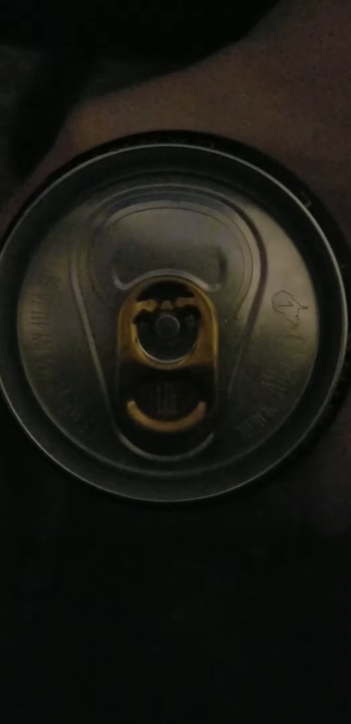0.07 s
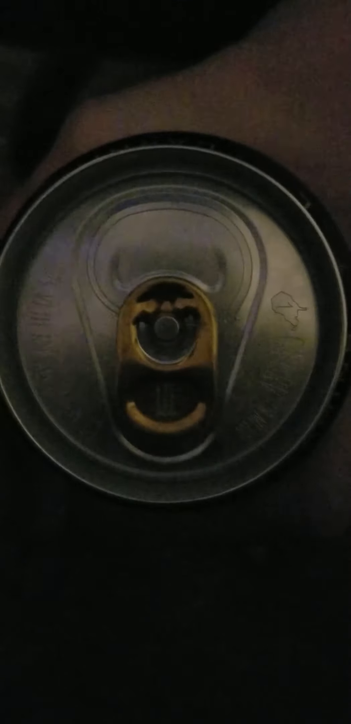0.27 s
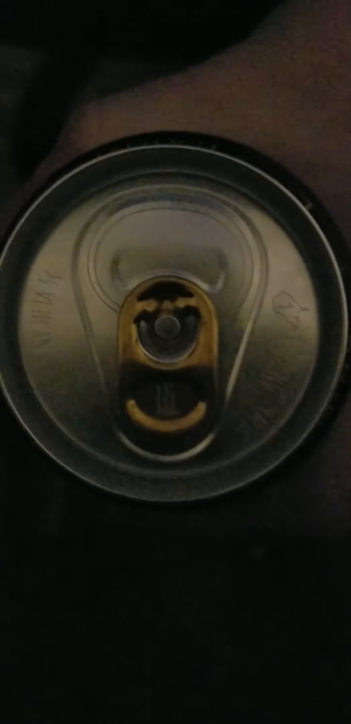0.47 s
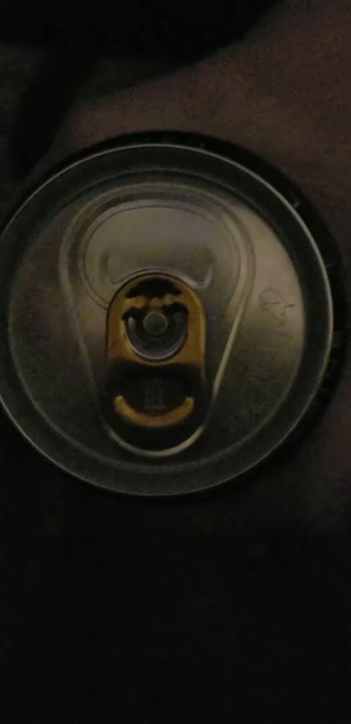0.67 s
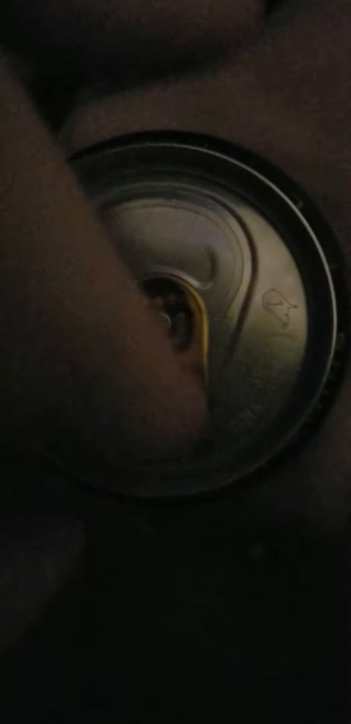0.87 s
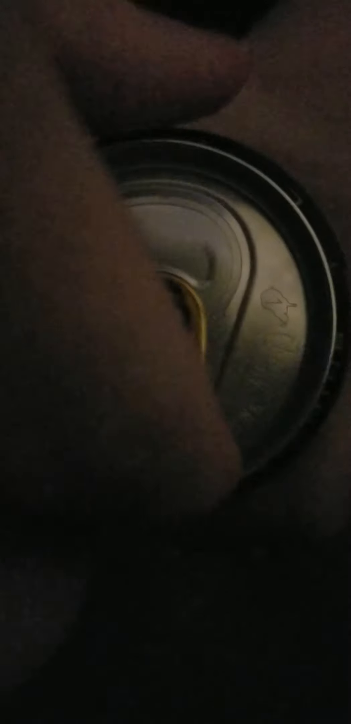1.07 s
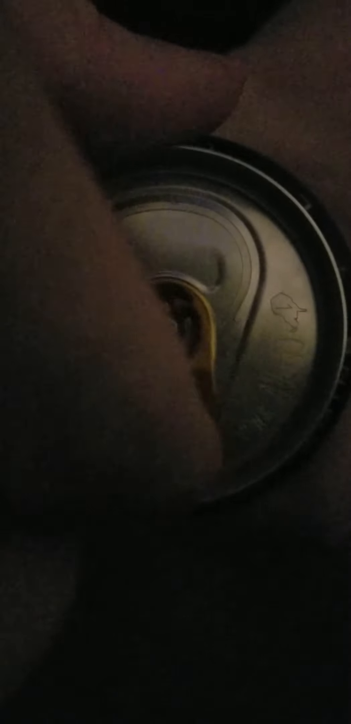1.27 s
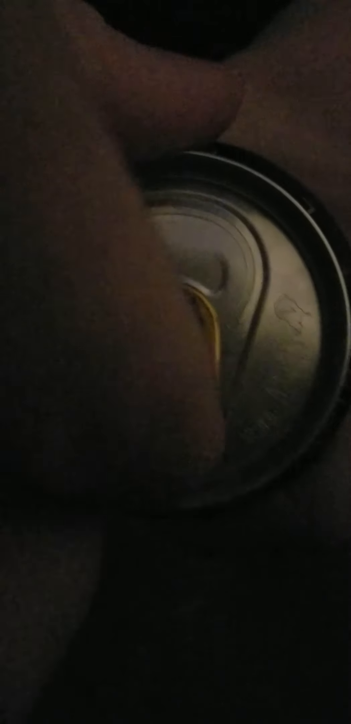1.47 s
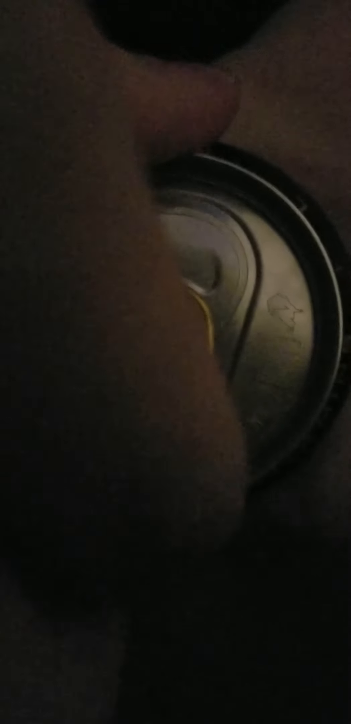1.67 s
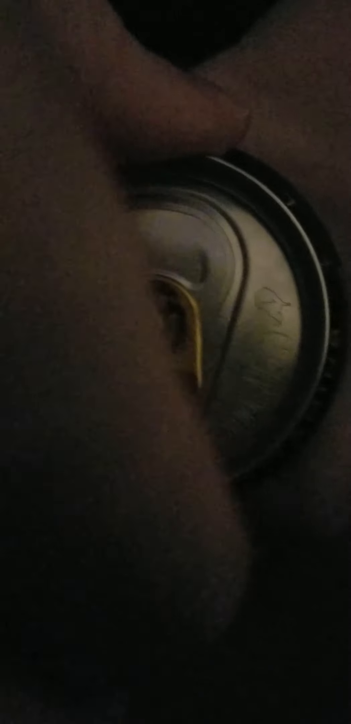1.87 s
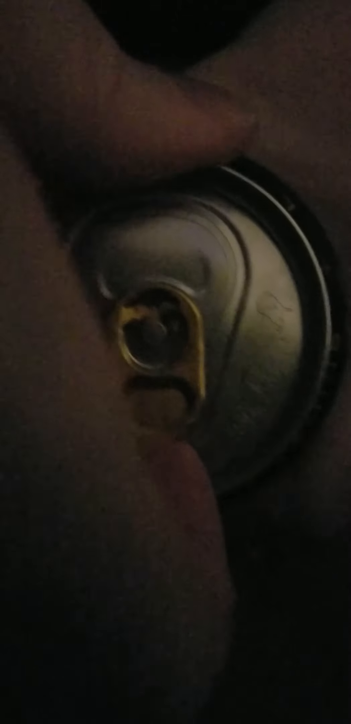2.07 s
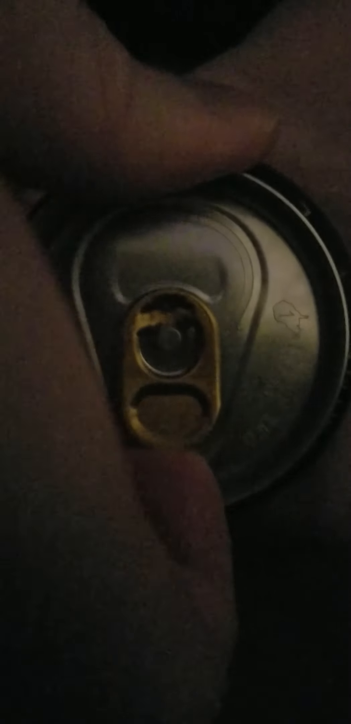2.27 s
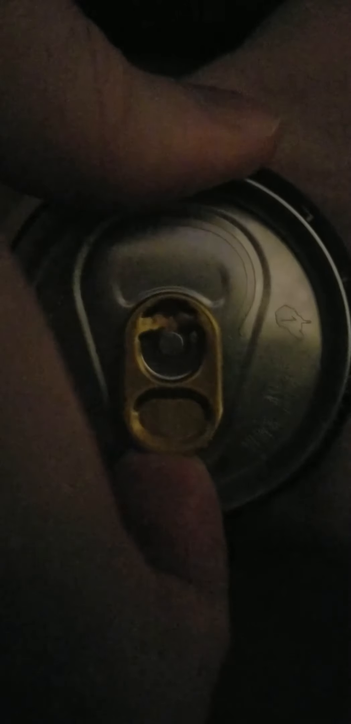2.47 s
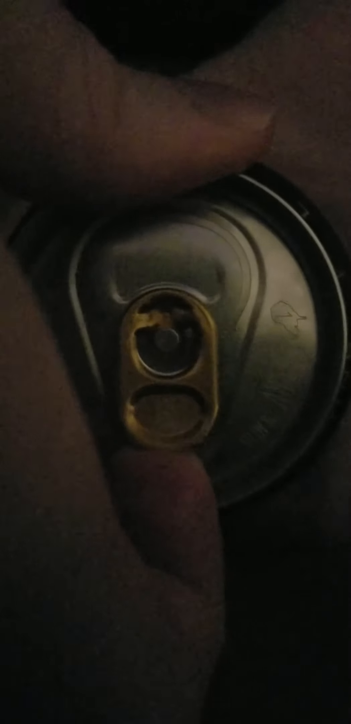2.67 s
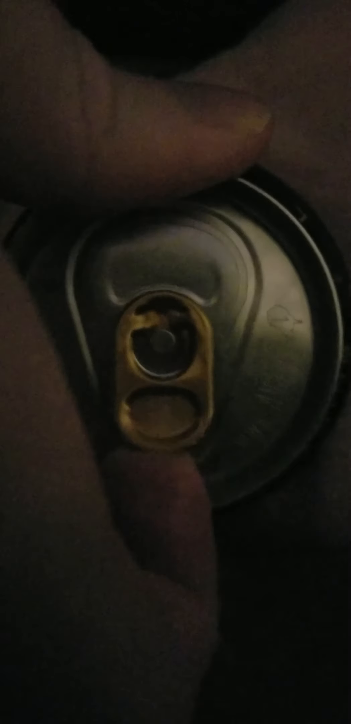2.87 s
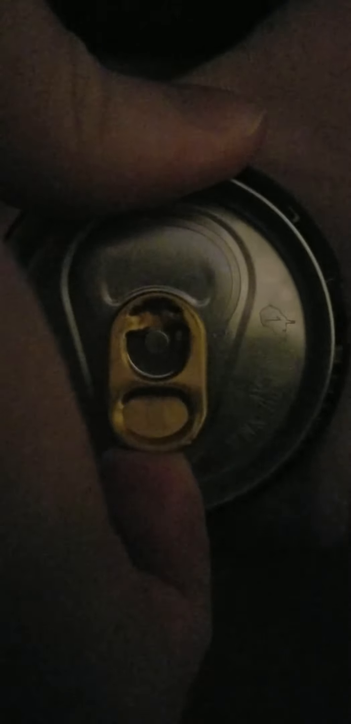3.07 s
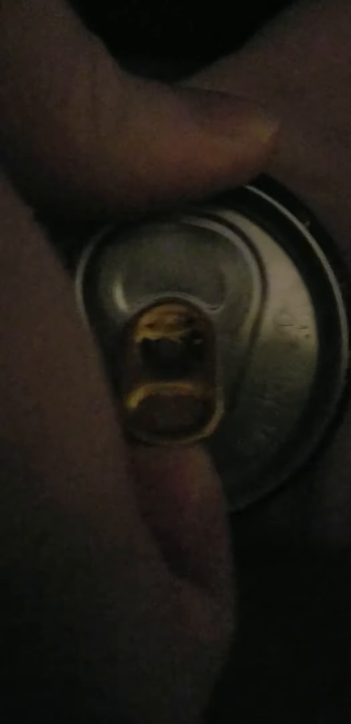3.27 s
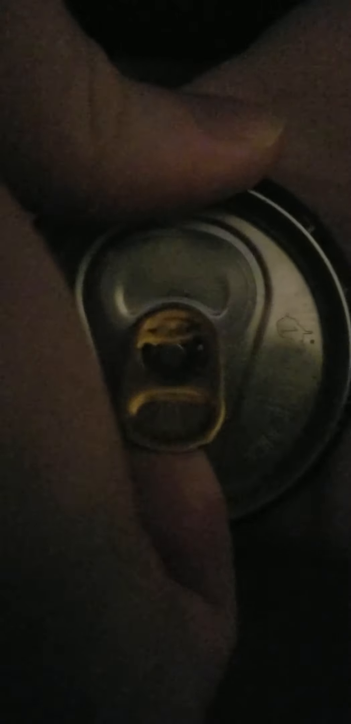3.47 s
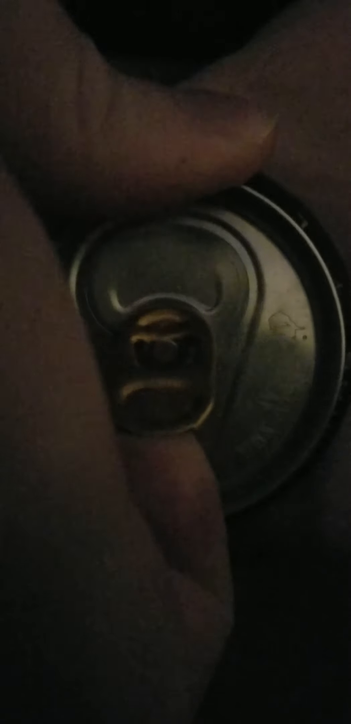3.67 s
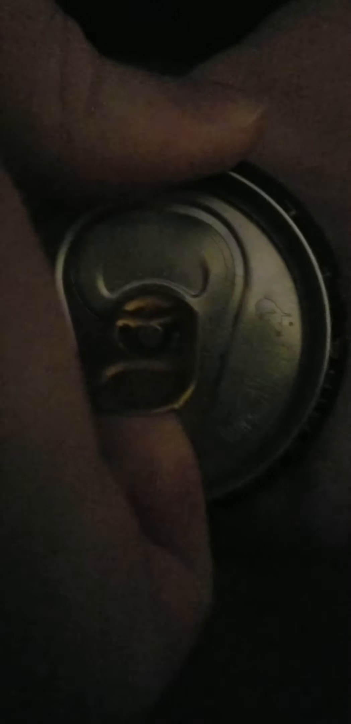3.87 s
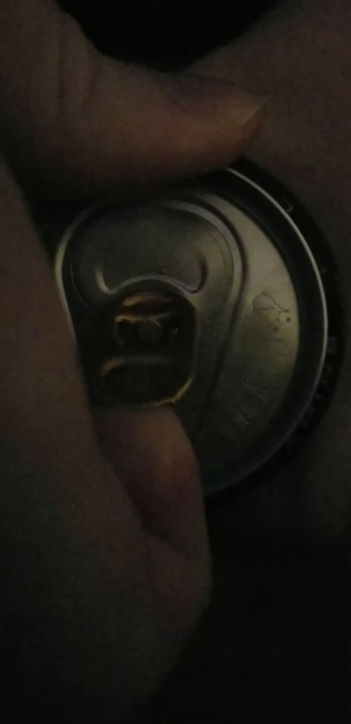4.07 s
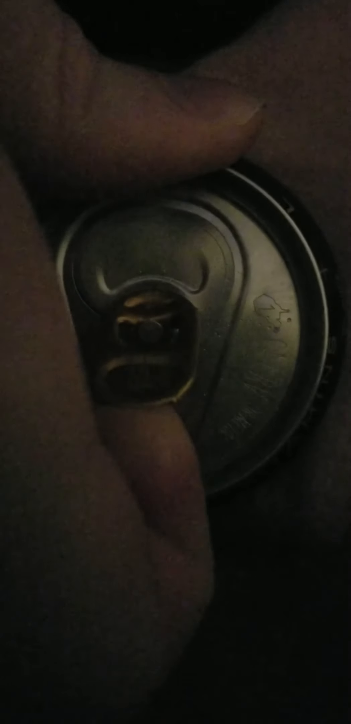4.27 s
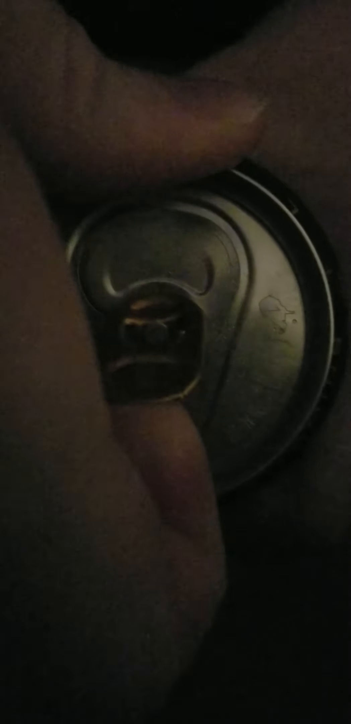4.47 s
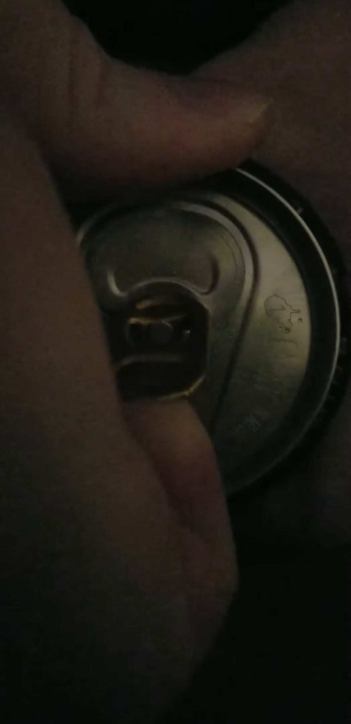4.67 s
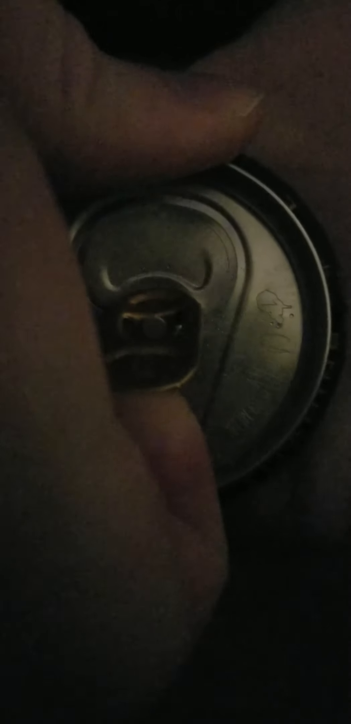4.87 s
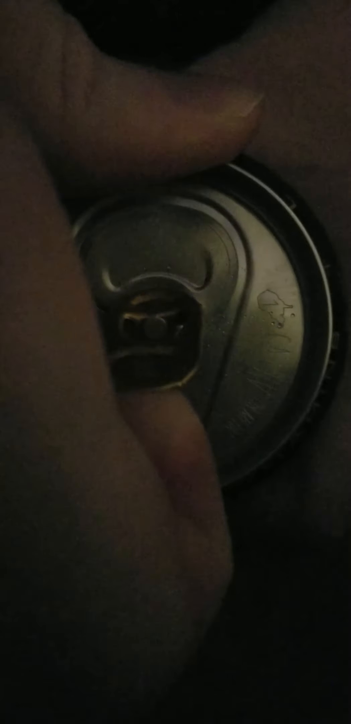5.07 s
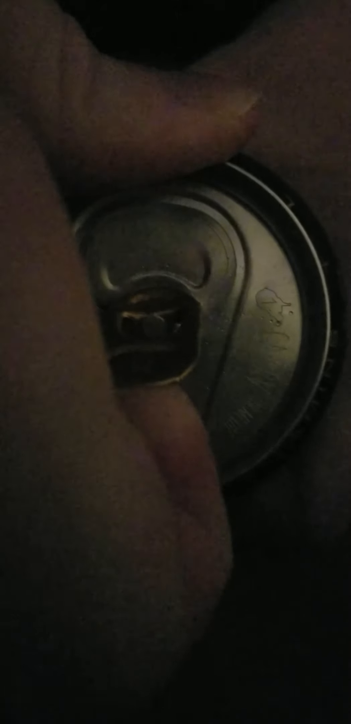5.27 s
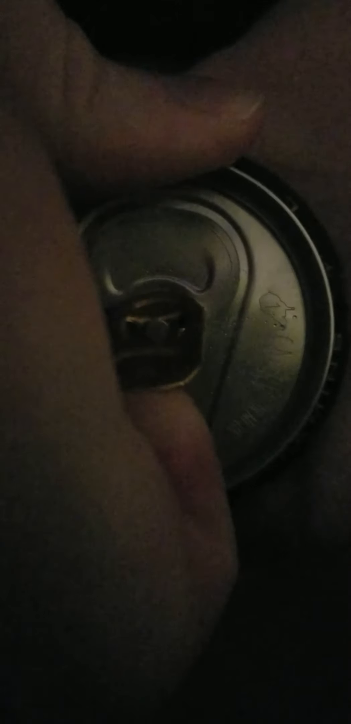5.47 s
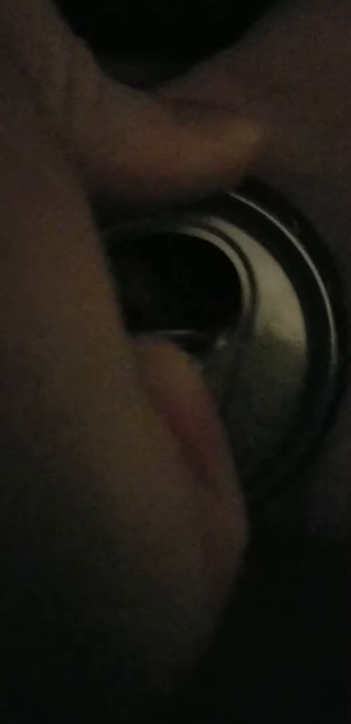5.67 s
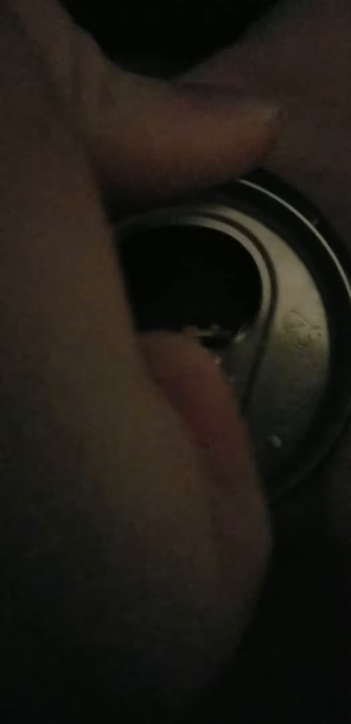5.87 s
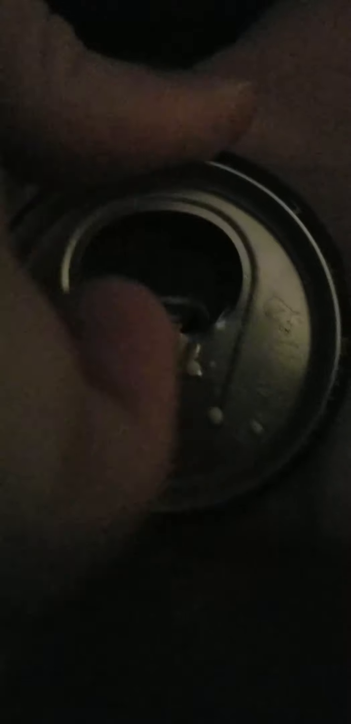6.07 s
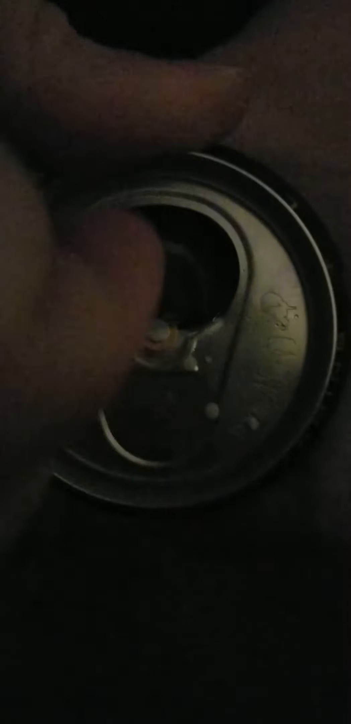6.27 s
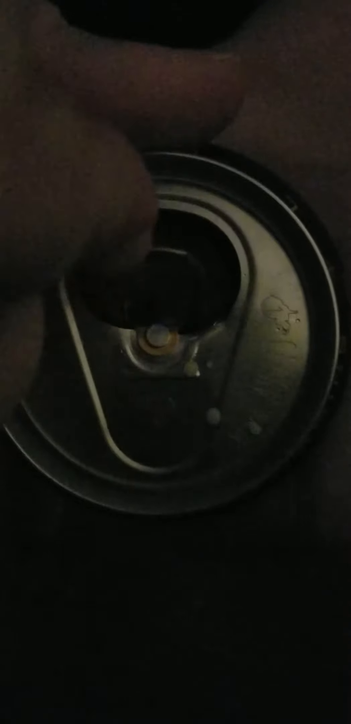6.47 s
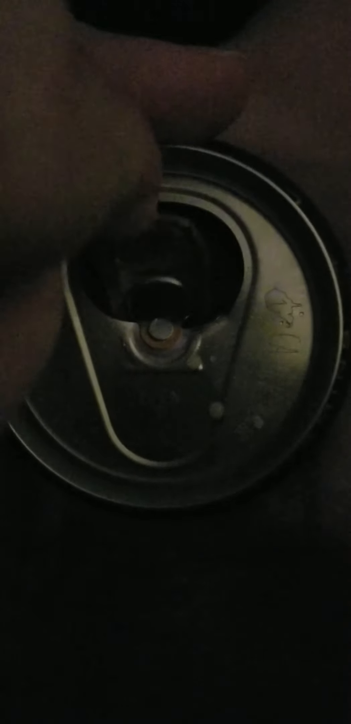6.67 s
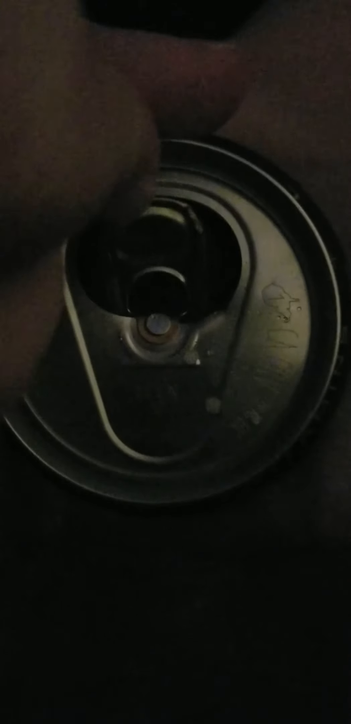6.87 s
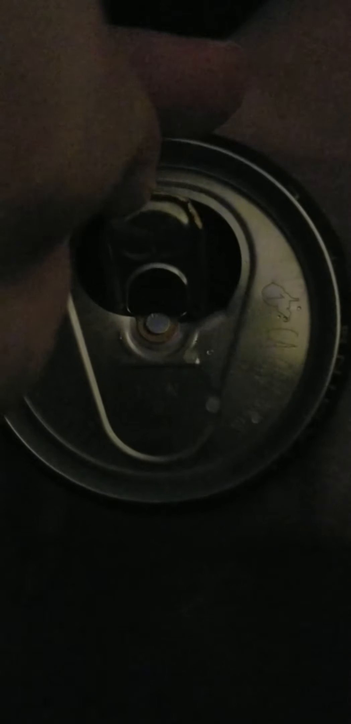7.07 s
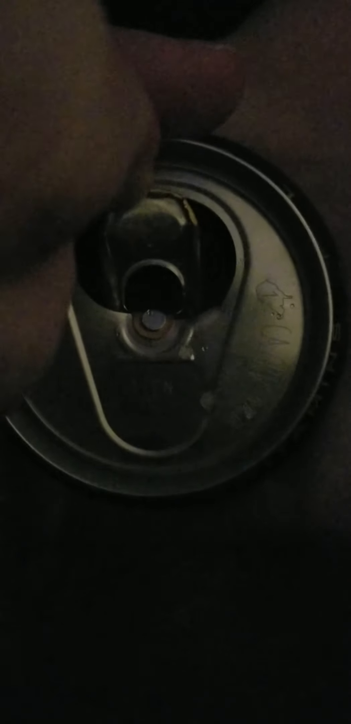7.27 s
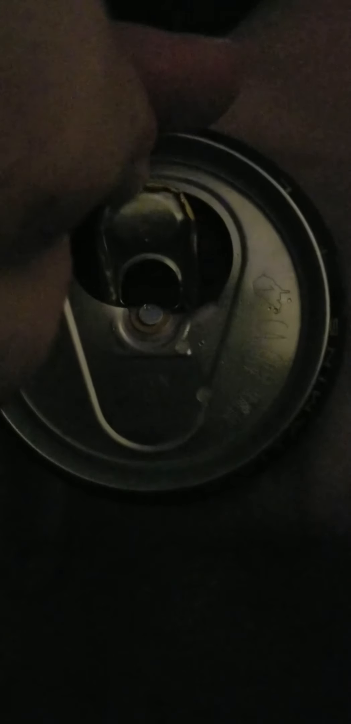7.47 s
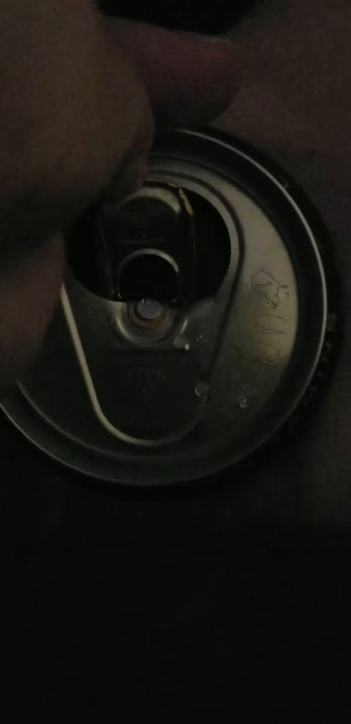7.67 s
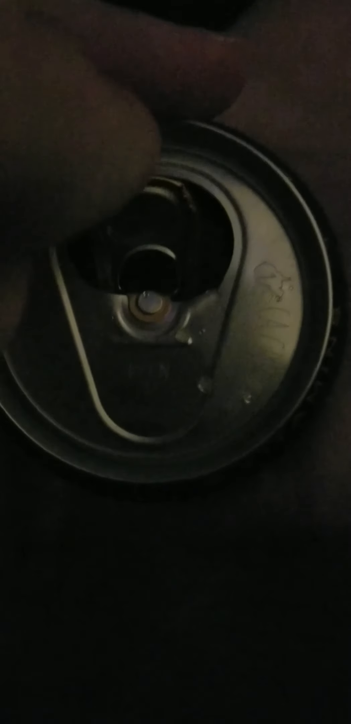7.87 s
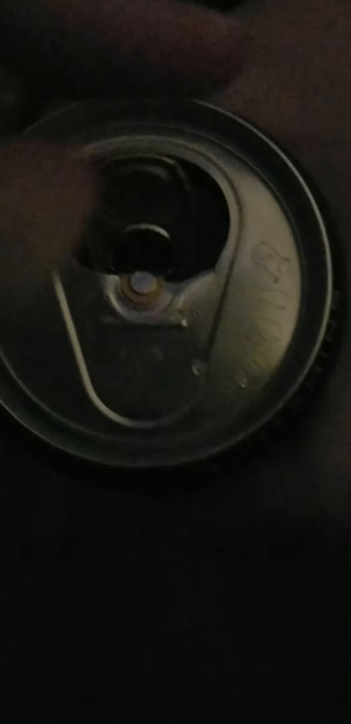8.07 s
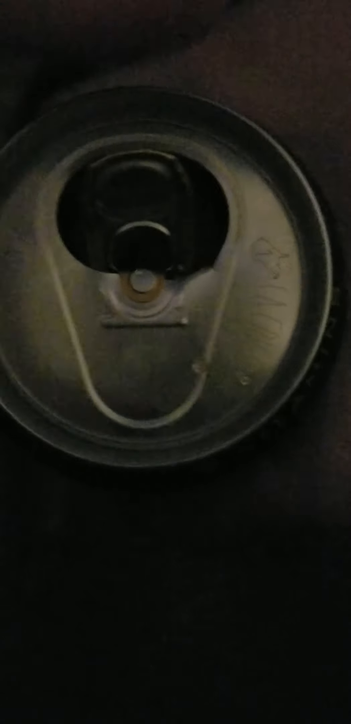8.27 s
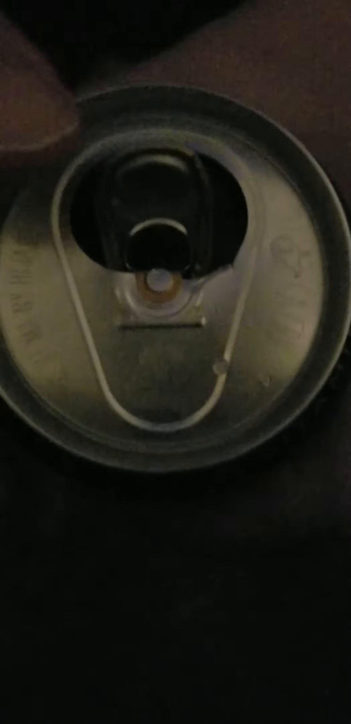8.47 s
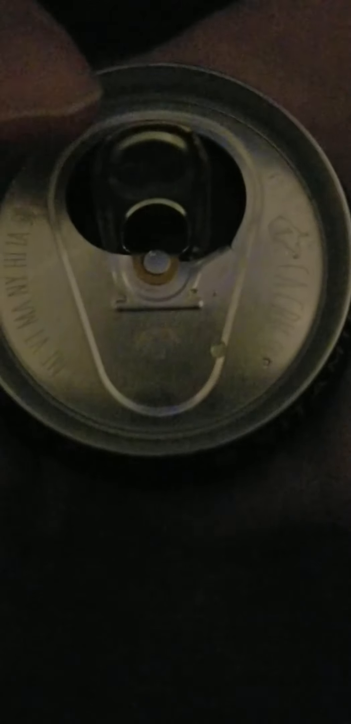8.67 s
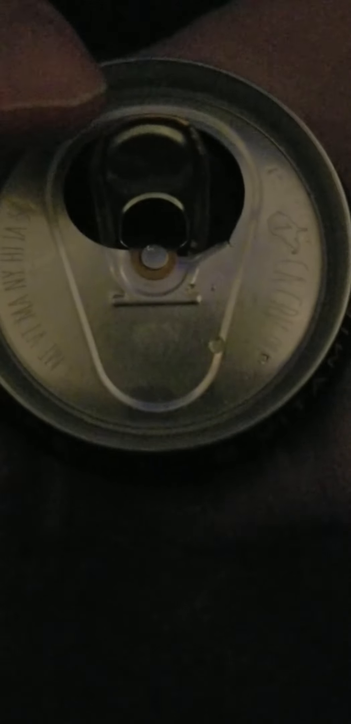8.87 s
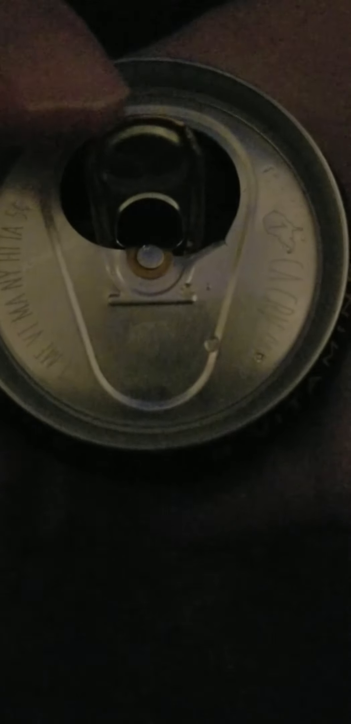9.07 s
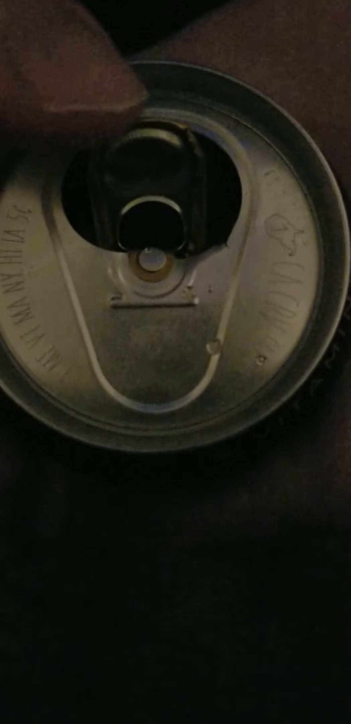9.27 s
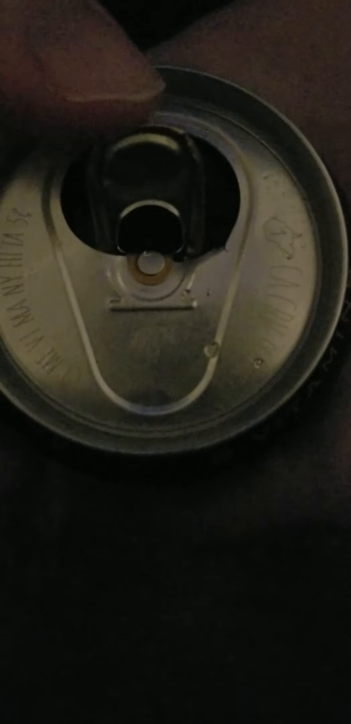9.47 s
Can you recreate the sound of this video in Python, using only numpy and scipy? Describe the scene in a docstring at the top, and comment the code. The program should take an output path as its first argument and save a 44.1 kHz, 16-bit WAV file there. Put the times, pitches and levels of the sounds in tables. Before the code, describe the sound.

A drink can is opened slowly, very near the microphone and slightly to the left, over the soft hum and hiss of a small room. First comes a sharp double crack with a quick puff of gas, then scattered clicks of the pull tab. The lid finally gives with a short, crunchy metallic rip and a hollow ring. Bubbles fizz softly inside the can, with a few tiny ticks, as the room noise comes back up.

```python
"""A drink can is opened close to a camera in a small, quiet room.
The stressed lid cracks and gas spits out, buffeting the near microphone. The tab ticks as it is
levered up, the score tears in tiny fractures, the open can rings and bursting bubbles fizz.
The room tone sinks after the loud cracks and swells back near the end."""
import sys
import numpy as np
from scipy import signal
from scipy.fft import rfft, irfft
from scipy.io import wavfile

SR = 44100
rng = np.random.default_rng(int(sys.argv[2]) if len(sys.argv) > 2 else 0)


def dump_mix(stems):
    """Bounce the given channels to the path in sys.argv[1] as a 16-bit WAV at rate SR."""
    frames = np.atleast_2d(stems).T  # one column per channel
    limited = np.clip(frames, -1, 1)  # hard clip at full scale
    pcm = np.round(limited * 32767).astype(np.int16)
    wavfile.write(sys.argv[1], SR, pcm)


N = 419832

# lid snaps: start_s, level_db, panel_hz, panel_db, crack_decay_s, slope_db_per_octave
SNAPS = [(3.223, -6, 3640, -4, 0.00065, 6.5), (3.2606, -2.5, 2610, -5, 0.00074, 2),
         (3.5777, -8, 2055, 6, 0.0013, 1), (3.5838, -21, 2010, -5.5, 0.00072, 1),
         (3.591, -27, 2000, -2, 0.0018, -4), (3.597, -26, 1990, 2, 0.0029, 4.5),
         (3.6012, -23, 5430, 5, 0.0052, 2), (3.6083, -29, 2030, -2, 0.0022, -7),
         (3.6245, -28, 710, -8, 0.0022, 0.5), (3.629, -31, 696, -6, 0.0018, -3),
         (3.640, -37.5, 5430, -3, 0.0022, 8), (5.691, -8.5, 2943, 1.5, 0.0017, 3),
         (5.705, -14, 3140, 8, 0.0016, 0), (5.716, -19, 946, 9.5, 0.002, 0)]
# tab ticks: start_s, level_db, knock_hz, knock_db, ring_db, ping_hz, ping_db
TICKS = [(3.9534, -43.5, 740, -5.5, 4, 6800, 0), (3.9645, -39.5, 745, -11, -2, 6870, -2),
         (4.1402, -30, 760, -8.5, 1, 6920, -8), (4.328, -38, 765, -1.5, 7, 7740, -4),
         (4.4272, -29.5, 785, -1, -7, 7900, -12), (4.4291, -22.5, 782, -11, -9, 7830, -4),
         (4.441, -32, 830, -18, -14, 3900, 2), (4.4426, -24, 825, -4.5, -4, 7780, -10),
         (5.5714, -35, 920, -2, 2.5, 7650, 2), (5.5878, -25.5, 913, -2.5, 10, 7550, -8.5),
         (5.6149, -36, 900, -1, 4, 7700, -2.5), (5.673, -15, 910, -8, 3.5, 7550, 4),
         (8.0065, -49.5, 955, 14, 11.5, 4190, 9.5), (8.008, -49.5, 997, -1, -5, 7380, 13.5)]
# modes of lid, tab, and freed flap with the air under it: pitch_hz, level_db, t60_s
LID_MODES = [(705, -17, 0.036), (1283, -7.5, 0.0086), (1920, -1.5, 0.014), (2210, -6.5, .015),
             (2620, -13, 0.033), (3980, -3.5, 0.017), (5250, -7.5, .009), (6600, -7.5, 0.019),
             (7400, -14, .014)]
TAB_MODES = [(1430, -16, .013), (1844, -15, 0.012), (2200, -8, 0.019), (2602, -2.5, 0.019),
             (3200, -18, .016), (3960, -18.5, .012), (4640, -15.5, .012), (6295, -11.5, .018)]
OPEN_CAN_MODES = [(792, -30.5, 0.086), (930, -28, .09), (1275, -24.5, 0.09), (2850, -28.5, 0.16),
                  (3000, -29, .16), (3300, -30.5, 0.22), (3400, -32.5, 0.23)]
# envelopes of gas jet, tearing score and fizz: time_s, gain_db
JET_ENVELOPE = [(3.2225, -72), (3.2263, -17.5), (3.234, -14.5), (3.246, -20.5), (3.259, -18.5),
                (3.264, -28), (3.275, -72.5)]
TEAR_ENVELOPE = [(5.690, -71), (5.6935, -14.5), (5.703, -17), (5.711, -24), (5.719, -22), (5.726, -25),
                 (5.75, -40.5), (5.80, -73), (5.88, -79)]
FIZZ_ENVELOPE = [(5.7, -93), (6.0, -62), (6.35, -58.5), (6.9, -59.5), (7.5, -64.5), (8.3, -64),
                 (9.5, -67.5)]
# gusts on the near microphone: start_s, swing_db, swing_hz, decay_s, turbulence_db
PUFFS = [(3.2234, -17, 67.04, 0.0092, -30), (5.693, -29, 62, 0.014, -40.5),
         (5.708, -44, 149.7, 0.0064, -51)]
# faint finger and bubble ticks: start_s, level_db
SPECKS = [(1.3658, -51), (2.012, -56), (2.1151, -57), (4.904, -63), (6.1709, -63.5), (8.108, -57),
          (8.6326, -50.5), (9.229, -50.5)]
# source spectra: freq_hz, relative_db
CRACK_COLOUR = [(100, -26), (450, -22), (750, -1.5), (1800, 2.5), (3000, 2), (4000, -1.5), (5500, 0),
                (7400, -3), (8800, -14.5), (11000, -8), (15500, -5)]
JET_COLOUR = [(100, -29.5), (850, -27), (1600, -6.5), (2200, -6.5), (3300, -2), (4000, -5), (6800, -4.5),
              (8400, -13.5), (11500, -1), (14500, 3), (15500, 2)]
TEAR_COLOUR = [(100, -31), (560, -30.5), (760, -12.5), (900, -7.5), (1080, -10), (1300, -4), (1700, -5),
               (2400, 1), (2900, 3.5), (3500, -1), (4600, -10), (6400, -7), (9000, -22.5), (13000, -14.5)]
TURBULENCE_COLOUR = [(60, 4), (200, -3.5), (500, -7.5), (900, -17), (1800, -16), (4000, -31)]
FIZZ_COLOUR = [(1500, -22.5), (3300, 2), (4800, -10), (7000, 2.5), (9000, -11.5), (12000, -7), (15500, -4)]
SPECK_COLOUR = [(500, -25), (2500, -14), (5000, 2), (7300, 6), (9000, -14), (12000, -7), (15000, 4)]
# camera body's shadow on the far microphone: freq_hz, gain_db
SHADOW = [(100, -15.5), (800, -14), (1500, -20.5), (2500, -14), (4800, -6.5), (6200, -18), (9000, -32.5),
          (15000, -28.5)]
# reverb spectrum at each microphone: freq_hz, gain_db
ROOM_LEFT = [(200, -19), (800, -11.5), (2000, -17), (5000, -17.5), (8000, -14.5), (15000, -16.5)]
ROOM_RIGHT = [(200, -20), (800, -9.5), (1500, -13), (2800, -12), (4500, -6), (6500, -19), (9000, -14),
              (15000, -22)]
# reverb decay: freq_hz, t60_s
ROOM_T60 = [(300, .3), (1000, 0.32), (3300, 0.3), (5500, .35), (9000, 0.27), (15000, 0.14)]
# room tone spectrum: freq_hz, relative_db
TONE_COLOUR = [(15, -37.5), (25, -3), (59, 1.5), (123, -7), (179, -18), (222, -13.5), (382, -16),
               (449, -14), (604, -24.5), (929, -17), (1120, -18), (1680, -17.5), (7220, -44), (8730, -57.5),
               (15800, -44.5)]
# broad humps on it: centre_hz, width_hz, gain_db
TONE_HUMPS = [(450, 65, 4), (665, 120, 5), (913, 80, 6), (2096, 180, 3.5), (2870, 190, 2.5), (3989, 200, 5),
              (7450, 450, 7), (8700, 700, -3.5), (12000, 1500, 3.5), (16000, 1200, -5.5)]
# room tone, left-right likeness: freq_hz, correlation
TONE_LIKENESS = [(60, 0.9), (240, 0.69), (950, -0.18), (3770, 0.11), (15000, -0.01)]
# room tone balance: freq_hz, left_minus_right_db
TONE_BALANCE = [(60, 2.5), (180, 5.5), (550, -1.5), (1650, 4), (4970, -9), (15000, 9)]
# hum partials: pitch_hz, level_db
HUM = [(78, -65), (120, -59), (238, -68.5)]
# sink and swell of room tone and fizz: time_s, gain_db
SWELL = [(0, -0.5), (1.5, 0.5), (3.22, 1.5), (3.27, -11.5), (4.4, -11), (5.68, -8.5), (5.73, -15.5),
         (6.6, -16.5), (7.3, -14), (7.85, -13), (8.4, -5.5), (9.15, 1.5), (9.52, 2)]


def lid_snaps(lid_db=-4, crack_db=-2, panel_t60_s=0.017):
    """The stressed lid gives way in jerks: a crack, the lid's modes and the panel that just moved."""
    out, t = np.zeros(N), np.arange(SR // 10) / SR
    for start_s, db, panel_hz, panel_db, decay_s, slope in SNAPS:
        modes = amp(lid_db) * ring(LID_MODES, t) + ring([(panel_hz, panel_db, panel_t60_s)], t)
        snap = modes / 2 + amp(crack_db) * crack(t, decay_s)
        add(out, start_s, amp(db) * tilt(snap, slope))
    return out


def tab_ticks(crack_db=-1, crack_decay_s=0.0017, knock_t60_s=0.034, ping_t60_s=0.024):
    """The tab slips on its rivet; the can's hollow knock rises in pitch as the tab lifts."""
    out, t = np.zeros(N), np.arange(SR // 10) / SR
    for start_s, db, knock_hz, knock_db, ring_db, ping_hz, ping_db in TICKS:
        knock_and_ping = ring([(knock_hz, knock_db, knock_t60_s), (ping_hz, ping_db, ping_t60_s)], t)
        modes = amp(ring_db) * ring(TAB_MODES, t) + knock_and_ping
        add(out, start_s, amp(db) * (modes / 2 + amp(crack_db) * crack(t, crack_decay_s)))
    return out


def crack(t, decay_s):
    """Tiny slips in the metal, dying within milliseconds."""
    slips = rng.choice([-1., 1.], len(t)) * np.exp(-t / decay_s)
    return colour(slips, CRACK_COLOUR)


def gas_jet():
    """Escaping gas: a short spit of noise."""
    return burst(rng.standard_normal(N), JET_ENVELOPE, JET_COLOUR)


def score_tear():
    """The score parts in many tiny fractures."""
    return burst(grains(per_s=4500, spread_db=0), TEAR_ENVELOPE, TEAR_COLOUR)


def open_can(start_s=5.695, rise_s=0.0061):
    """Flap and air resonances build while the score tears, then die away."""
    out, t = np.zeros(N), np.arange(SR // 2) / SR
    add(out, start_s, ring(OPEN_CAN_MODES, t) * (1 - np.exp(-t / rise_s)))
    return out


def gas_puffs(turbulence_decay_s=0.022):
    """Each gust buffets the near microphone and pushes it through a slow, damped swing."""
    out, t = np.zeros(N), np.arange(SR // 5) / SR
    for start_s, swing_db, swing_hz, decay_s, turbulence_db in PUFFS:
        add(out, start_s, amp(swing_db) * np.exp(-t / decay_s) * np.sin(2 * np.pi * swing_hz * t))
        turbulence = rng.standard_normal(len(t)) * np.exp(-t / turbulence_decay_s)
        add(out, start_s, amp(turbulence_db) * colour(turbulence, TURBULENCE_COLOUR))
    return out


def fizz():
    """Small bubbles burst inside the open can."""
    return colour(grains(per_s=6000, spread_db=3) * gain_curve(FIZZ_ENVELOPE), FIZZ_COLOUR)


def specks(decay_s=0.0019):
    """Dry ticks of fingers on the can and of single bubbles."""
    out, t = np.zeros(N), np.arange(SR // 50) / SR
    for start_s, db in SPECKS:
        tick = rng.standard_normal(len(t)) * np.exp(-t / decay_s)
        add(out, start_s, amp(db) * colour(tick, SPECK_COLOUR))
    return out


def mic_paths(x, far_db, room_db, lag_s=0.0005):
    """Direct pair and room send. The can is by the left microphone; the right hears it late and dull."""
    far = amp(far_db) * signal.oaconvolve(x, min_phase(SHADOW))[:N]
    return np.array([x, np.roll(far, round(lag_s * SR))]), amp(room_db) * x


def room_response(onset_s=0.0036, early_db=11, early_s=0.041, echoes_per_s=6000):
    """Dense reflections, strongest from nearby surfaces; each band dies at its own rate."""
    echoes = rng.choice([-1., 1.], (2, SR // 2)) * (rng.random((2, SR // 2)) < echoes_per_s / SR)
    hz, frame_s, bands = signal.stft(echoes, SR, nperseg=256)
    decay = amp(-60 * frame_s / at_hz(ROOM_T60, hz)[:, None])
    tails = signal.istft(bands * decay, SR, nperseg=256)[1]
    t = np.arange(tails.shape[1]) / SR
    tails = tails * np.clip(t / onset_s - 1, 0, 1) * amp(early_db * np.exp(-t / early_s))
    return np.array([signal.oaconvolve(tail / np.linalg.norm(tail), min_phase(side))
                     for tail, side in zip(tails, (ROOM_LEFT, ROOM_RIGHT))])


def reverb(x, turn_hz=20, count=3):
    """Several room responses take turns, keeping the tail diffuse."""
    angle = 2 * np.pi * turn_hz * np.arange(N) / SR
    feeds = [x * np.sqrt(2 / count) * np.cos(angle + np.pi * k / count) for k in range(count)]
    return sum(signal.oaconvolve(feed[None], room_response(), axes=1)[:, :N] for feed in feeds)


def room_tone(air_db=-51, waver_rad=0.35, waver_hz=4):
    """Distant rumble and hiss, partly shared by the microphones, over a wavering hum."""
    hz, t = np.fft.rfftfreq(N, 1 / SR), np.arange(N) / SR
    left, independent = rfft(rng.standard_normal((2, N)))
    likeness = at_hz(TONE_LIKENESS, hz)
    right = likeness * left + np.sqrt(1 - likeness ** 2) * independent
    lean_db = at_hz(TONE_BALANCE, hz) / 2
    pair = np.array([left * amp(lean_db), right * amp(-lean_db)])
    humps_db = sum(db * np.exp(-((hz - centre) / width) ** 2) for centre, width, db in TONE_HUMPS)
    air = irfft(pair * amp(at_hz(TONE_COLOUR, hz) + humps_db), N)
    hum = 0
    for pitch_hz, db in HUM:
        drift = unit_rms(irfft(rfft(rng.standard_normal(N)) * (hz < waver_hz), N))
        hum = hum + amp(db) * np.sin(2 * np.pi * pitch_hz * t + waver_rad * drift)
    return amp(air_db) * air / air.mean(0).std() + hum


def ring(modes, t):
    """Decaying sines, neighbours in opposite phase."""
    return sum((-1) ** k * amp(db - 60 * t / t60_s) * np.sin(2 * np.pi * hz * t)
               for k, (hz, db, t60_s) in enumerate(modes))


def grains(per_s, spread_db):
    """Random clicks; spread_db makes a few stand out."""
    size = amp(spread_db * np.minimum(rng.exponential(1, N), 4))
    return unit_rms(size * rng.choice([-1., 1.], N) * (rng.random(N) < per_s / SR))


def burst(drive, envelope, spectrum):
    """A drive cut off at its envelope's end, then coloured."""
    active = np.arange(N) < envelope[-1][0] * SR
    return colour(drive * gain_curve(envelope) * active, spectrum)


def colour(x, spectrum):
    """Filter that keeps the power of white noise."""
    taps = min_phase(spectrum)
    return signal.oaconvolve(x, taps / np.linalg.norm(taps))[:len(x)]


def tilt(x, db_per_octave, pivot_hz=3000):
    """Spectral slope across the metal's middle range."""
    slope = [(hz, db_per_octave * np.log2(hz / pivot_hz)) for hz in (750, 4500)]
    return signal.oaconvolve(x, min_phase(slope))[:len(x)]


def min_phase(spectrum, size=4096):
    """Shortest causal response with this spectrum."""
    log_gain = np.log(amp(at_hz(spectrum, abs(np.fft.fftfreq(size, 1 / SR)))))
    response = np.exp(np.conj(signal.hilbert(log_gain)))
    return np.fft.ifft(response).real[:size // 2]


def high_pass(x, hz, order):
    """Butterworth low cut."""
    return signal.sosfilt(signal.butter(order, hz, "high", fs=SR, output="sos"), x)


def at_hz(table, hz):
    """Table value at hz, on a log axis."""
    freq_hz, value = np.transpose(table)
    return np.interp(np.log(hz + 1), np.log(freq_hz + 1), value)


def gain_curve(envelope):
    """Gain per sample, silent before the first point."""
    return amp(np.interp(np.arange(N) / SR, *np.transpose(envelope), left=-200))


def amp(db):
    """Decibels to gain."""
    return 10 ** (np.asarray(db) / 20)


def unit_rms(x):
    """Scales to an rms of 1."""
    return x / np.sqrt(np.mean(x ** 2) + 1e-20)


def add(mix, start_s, sound):
    """Mixes a sound in, in place."""
    part = mix[round(start_s * SR):][:len(sound)]
    part += sound[:len(part)]


def scene(radiate_hz=520, speck_far_db=-3):
    """The can, heard directly and by way of the room, over room tone."""
    jet, tear = gas_jet(), score_tear()
    snaps = high_pass(lid_snaps(), radiate_hz, order=3)  # a small lid radiates little bass
    ticks = high_pass(tab_ticks(), radiate_hz, order=3)
    swell = gain_curve(SWELL)
    paths = [mic_paths(snaps, far_db=-3.5, room_db=-3),
             mic_paths(ticks, far_db=-1.5, room_db=-2),
             mic_paths(jet, far_db=6, room_db=-1.5),
             mic_paths(tear, far_db=7, room_db=4.5, lag_s=0.0003),
             mic_paths(open_can(), far_db=6, room_db=0, lag_s=0.0003),
             mic_paths(fizz() * swell, far_db=3.5, room_db=-1.5)]
    direct, room_send = (sum(parts) for parts in zip(*paths))
    direct[0] += gas_puffs()
    direct += specks() * amp([[0], [speck_far_db]])
    return direct + reverb(room_send) + room_tone() * swell


def record(dry, low_cut_hz=32, band_limit_hz=16100):
    """The microphones lose the deepest bass; peaks stop at full scale; then the band limit."""
    limited = np.clip(high_pass(dry, low_cut_hz, order=4), -1, 1)
    low_pass = signal.firwin(255, band_limit_hz, window=("kaiser", 9), fs=SR)
    return signal.oaconvolve(limited, low_pass[None], "same")


dry = scene()
out = record(dry)
dump_mix(out)
```